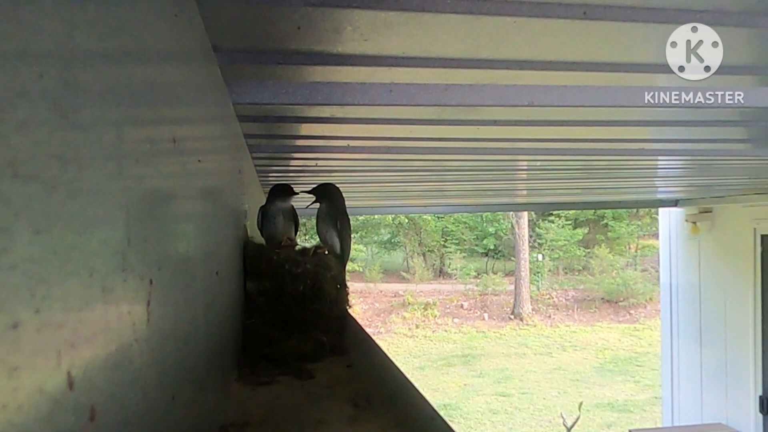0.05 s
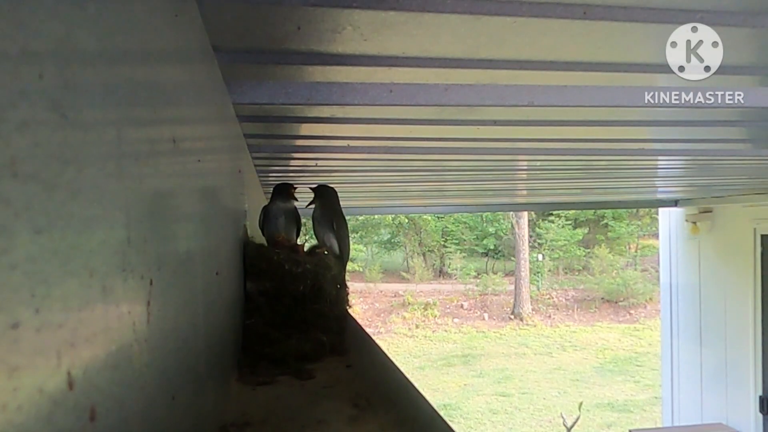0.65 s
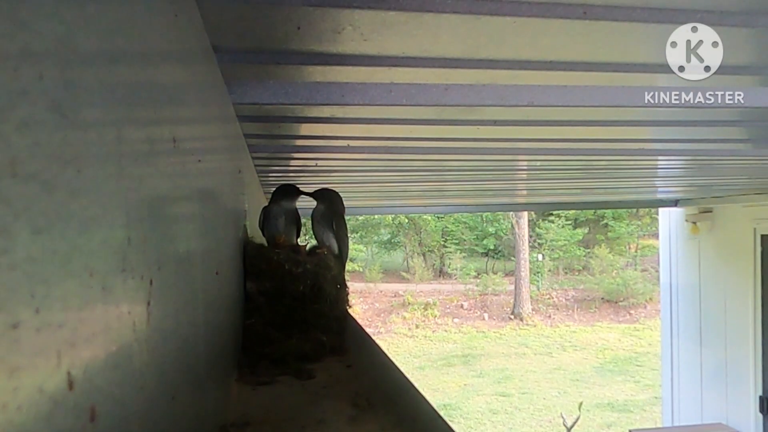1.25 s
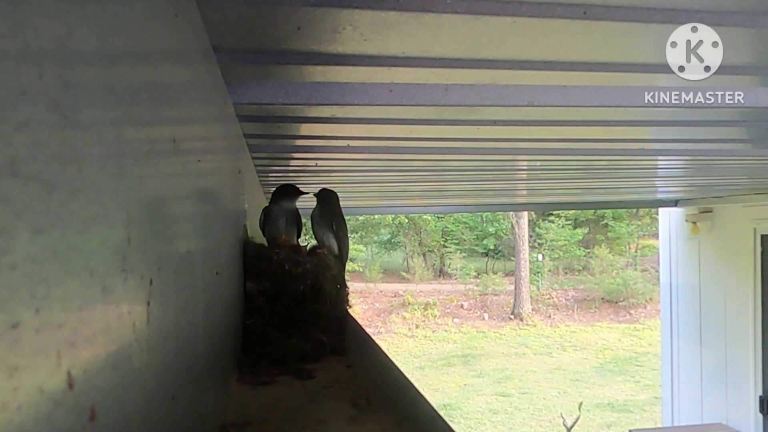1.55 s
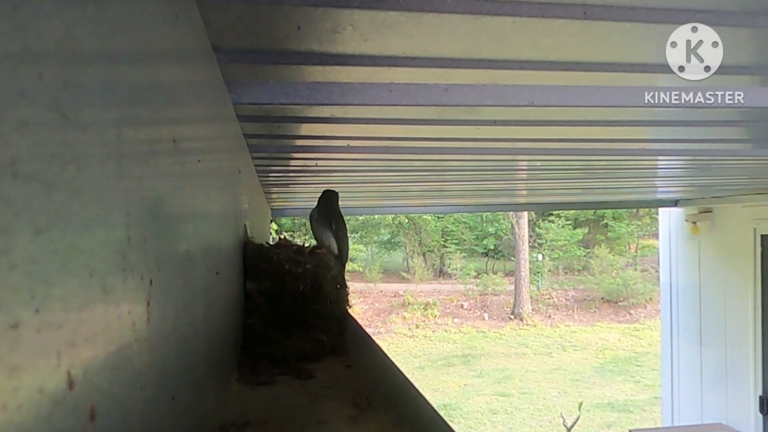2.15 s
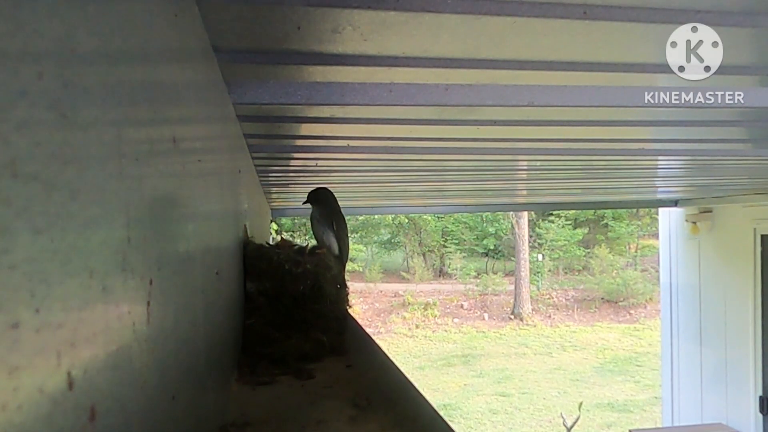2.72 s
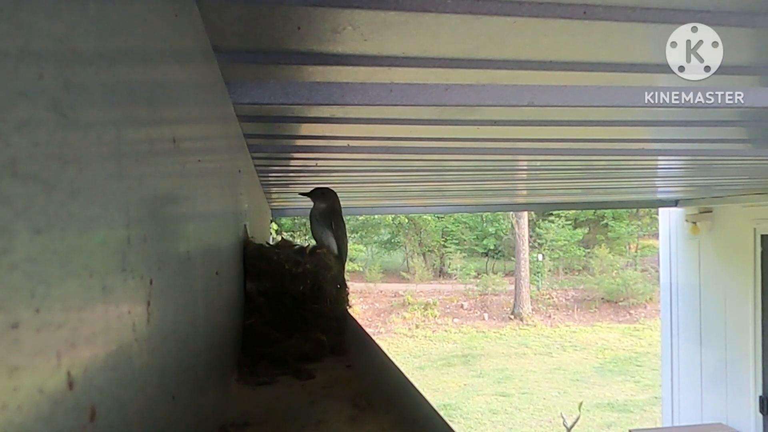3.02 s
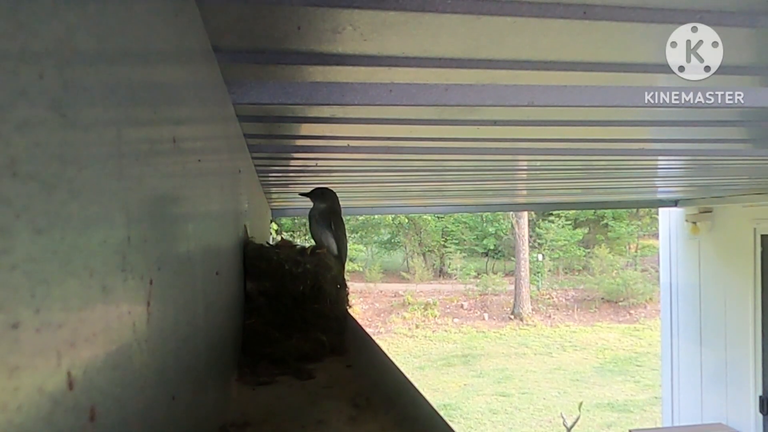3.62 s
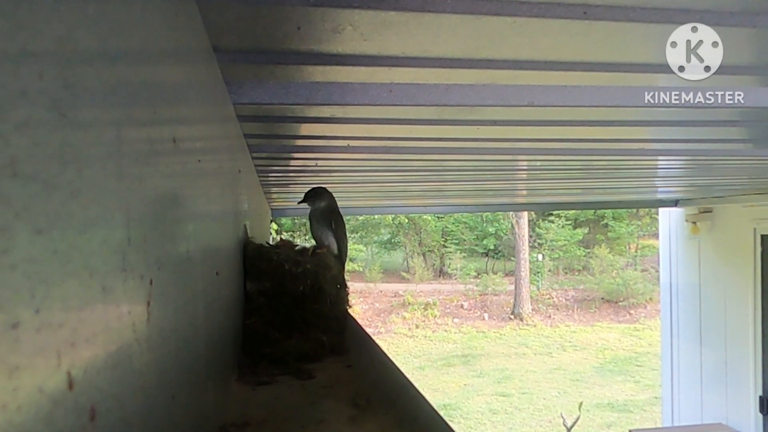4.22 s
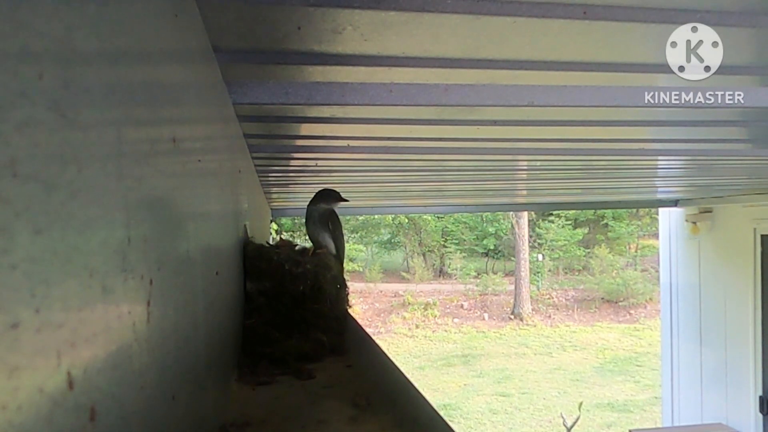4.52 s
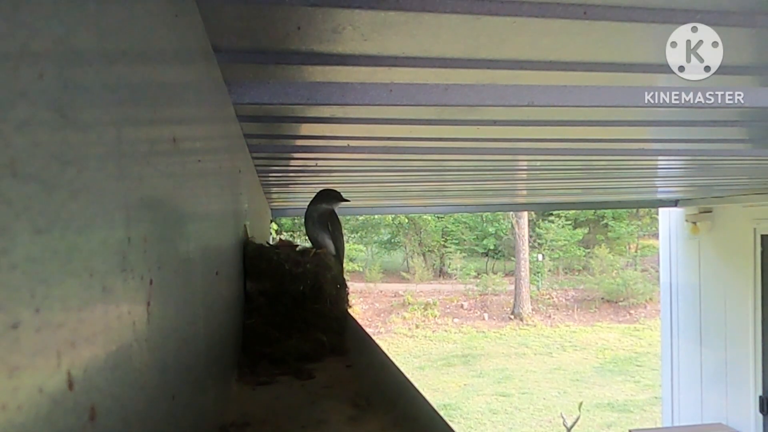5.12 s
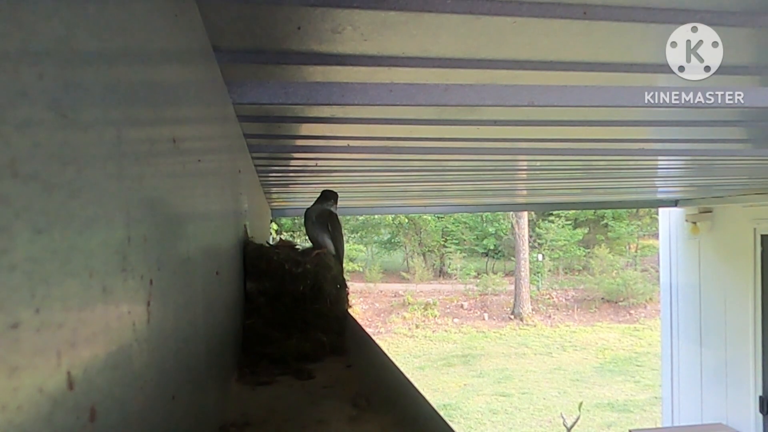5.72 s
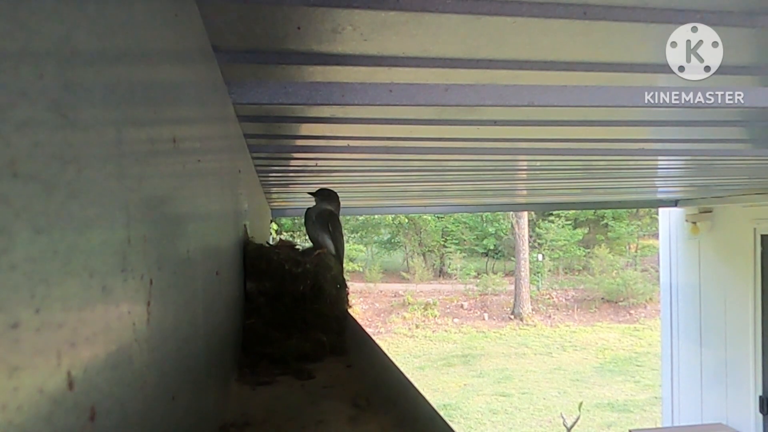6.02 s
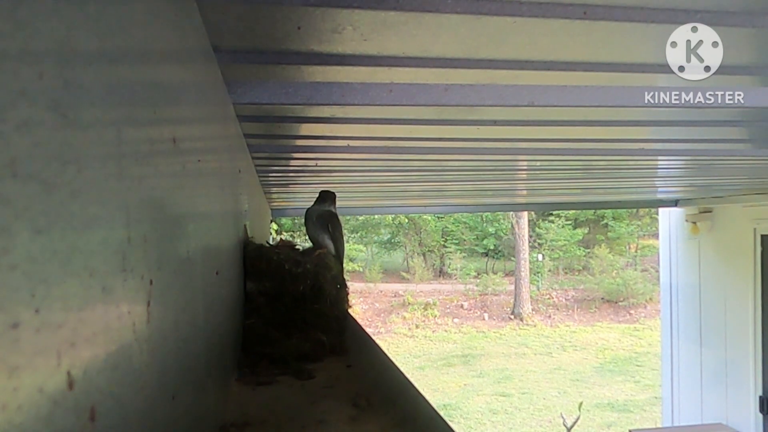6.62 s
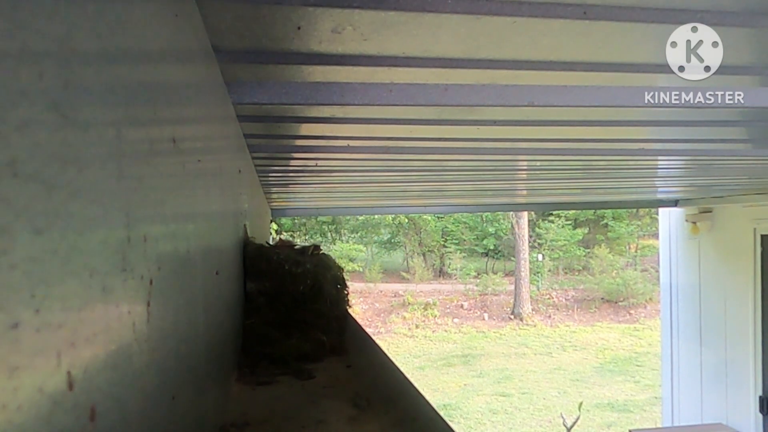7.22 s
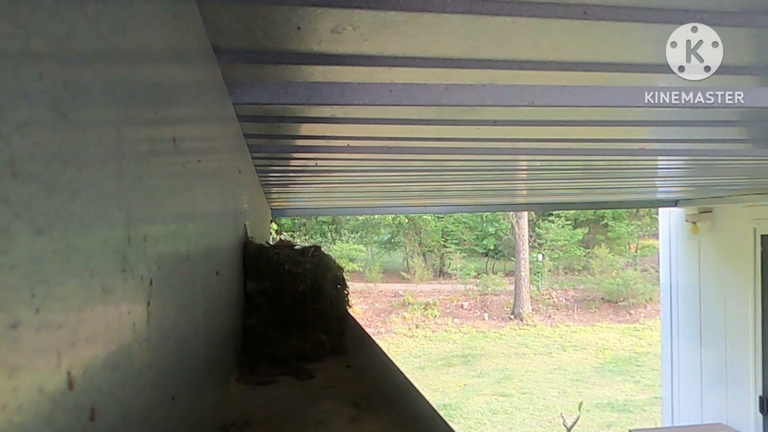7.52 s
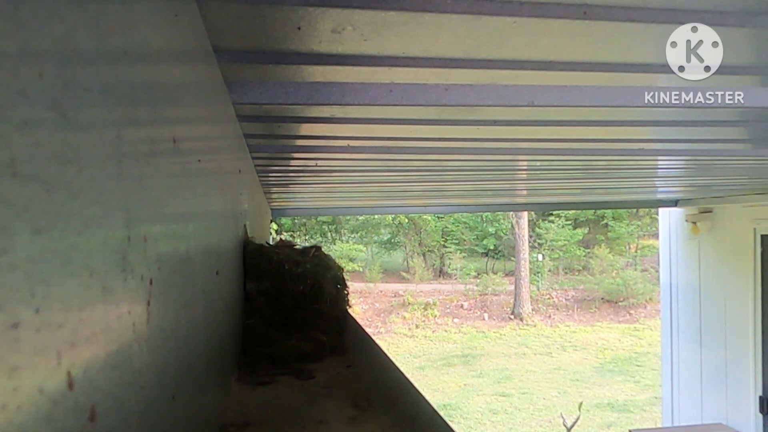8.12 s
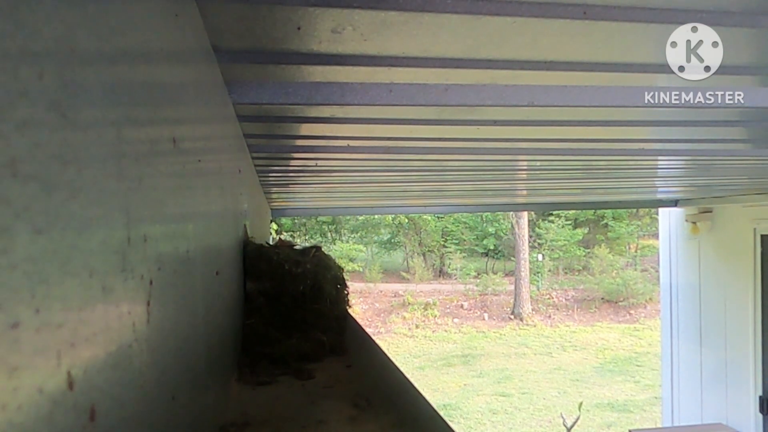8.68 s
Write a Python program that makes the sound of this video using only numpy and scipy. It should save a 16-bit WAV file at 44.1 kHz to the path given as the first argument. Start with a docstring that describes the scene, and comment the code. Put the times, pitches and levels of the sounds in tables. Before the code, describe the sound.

Pulsing frog trills and a few bird chirps outdoors, followed by a loud, close flurry of thumping wingbeats and swishing feathers.

```python
"""A distant road and a far frog chorus murmur beyond a porch roof. A bird at its nest gives one buzzy
chirp from its syrinx, then thin peeps and dry ticks of bill and claw. Tree frogs trill in the garden,
each note a pulse coloured by the vocal sac, while other birds call and hoarse squeaks fade in the trees.
Then the bird takes off and hovers beside the microphone, each wingbeat a thump of air with a swish
of feathers."""
import sys
import numpy as np
from scipy import signal
from scipy.fft import rfft, irfft, next_fast_len
from scipy.io import wavfile

SR = 44100
rng = np.random.default_rng(int(sys.argv[2]) if len(sys.argv) > 2 else 0)


def wav_record(signal):
    """Record a signal, one row per channel, as 16-bit PCM in the file named by sys.argv[1]."""
    frames = np.transpose(np.atleast_2d(signal))
    bounded = np.clip(frames, -1, 1)
    # unit amplitude maps onto the largest positive 16-bit level
    quanta = np.round(bounded * 32767).astype(np.int16)
    wavfile.write(sys.argv[1], SR, quanta)


N = 385875
TIME = np.arange(N) / SR


def from_db(db):
    """Decibels to gain."""
    return 10 ** (np.asarray(db) / 20)


def rms_one(x):
    """Scale to unit rms."""
    return x / np.sqrt(np.mean(x ** 2) + 1e-20)


def fader(points):
    """Gain riding along a curve of (seconds, dB) points."""
    return from_db(np.interp(TIME, *np.transpose(points)))


def drift(rate_hz):
    """Smooth random wander of spread 1."""
    hop, warm_up = 40, 2000
    pole = np.exp(-2 * np.pi * hop * rate_hz / SR)
    white = rng.standard_normal(N // hop + warm_up + 2)
    slow = signal.lfilter([1], [1, -2 * pole, pole * pole], white)[warm_up:]
    return np.interp(np.arange(N) / hop, np.arange(len(slow)), rms_one(slow))


def band(x, low_hz, high_hz, order=2):
    """Band-pass; a higher order gives steeper edges."""
    return signal.sosfilt(signal.butter(order, [low_hz, high_hz], "band", fs=SR, output="sos"), x + 1e-18)


def stereo(mid, side, side_db):
    """Left and right from a shared and an opposed part."""
    return mid + from_db(side_db) * side * np.array([[1], [-1]])


def noise(colour, side_db):
    """Stereo noise of rms 1, shaped by (Hz, dB) points and falling 40 dB an octave beyond them."""
    size = next_fast_len(N)
    hz, db = np.transpose(colour)
    bins = np.maximum(np.arange(size // 2 + 1) * SR / size, 1)
    octaves_beyond = np.abs(np.log2(bins / np.clip(bins, hz[0], hz[-1])))
    gain = from_db(np.interp(np.log(bins), np.log(hz), db) - 40 * octaves_beyond)
    mid, side = irfft(rfft(rng.standard_normal((2, size))) * gain, size)[:, :N]
    return rms_one(stereo(mid, side, side_db))


def echoes(x, t60, delay_s, side_db):
    """Diffuse reflections that arrive after a delay and die away; the tail has unit energy."""
    t = np.arange(SR) / SR
    tail = rng.standard_normal((2, SR)) * from_db(-60 * t / t60) * (t > delay_s)
    tail = stereo(tail[0], tail[1], side_db)
    return signal.fftconvolve(x[None], tail / np.sqrt(np.sum(tail ** 2) / 2), axes=1)[:, :N]


def add(out, start_s, sound):
    """Mix a short sound in at a time."""
    i = max(int(start_s * SR), 0)
    out[i:i + len(sound)] += sound[:max(N - i, 0)]


def bell(t, width_s):
    """Gaussian bump of height 1."""
    return np.exp(-.5 * (t / width_s) ** 2)


def beats(first_s, last_s, count, slowing_per_s):
    """Times of a run of beats whose spacing lengthens steadily."""
    progress, length = np.linspace(0, 1, count), last_s - first_s
    return first_s + length * progress * (1 + slowing_per_s * length * (progress - 1))


def garden(rumble_db=-54, hiss_db=-76, settle_db=-11, settle_s=1):
    """The bed: distant road, throbbing far chorus, insects, deep rumble, faint hiss and an appliance hum."""
    # Fader moves of road, frog chorus and insects. Each row: time in seconds, level in dB.
    road_levels = [(0.3, -56), (0.35, -55.5), (0.71, -51.5), (2.07, -48.5), (6.05, -47), (6.46, -43),
                   (7.0, -46.5)]
    chorus_levels = [(0.25, -75.5), (1.29, -64.5), (3.75, -65.5), (3.96, -60), (4.45, -71.5), (4.53, -62),
                     (4.72, -61.5), (4.9, -64), (4.98, -58), (5.29, -58), (5.42, -63), (6.92, -59),
                     (7.05, -66), (8.3, -64)]
    insect_levels = [(2.1, -84), (2.15, -81), (4.04, -81), (4.27, -86), (6.11, -79), (6.9, -84)]
    # Tone colours of the noise layers. Each row: frequency in Hz, relative level in dB.
    road_colour = [(60, -7.5), (110, -7), (156, 0), (210, -3), (270, -5.5), (340, -8.5), (390, -14),
                   (440, -11), (540, -26.5), (640, -28.5), (800, -40), (1000, -40)]
    rumble_colour = [(20, -1.5), (40, -4.5), (70, -2.5), (100, -16.5), (140, -24.5)]
    chorus_colour = [(800, -36.5), (1000, -19), (1200, -1), (1330, 1), (1410, 5.5), (1460, -2.5),
                     (1530, -9.5), (1750, -11), (2000, -8.5), (2400, -32.5), (2800, -25), (3200, -43.5)]
    insect_colour = [(3800, -11), (4200, -6), (4430, -3), (4650, -14.5), (4950, -24.5)]
    hiss_colour = [(500, -2), (1000, -5.5), (3000, -2.5), (5000, -12), (7500, -11), (10000, -24),
                   (14000, -39.5)]
    # Partials of a house appliance. Each row: frequency in Hz, settled rms level in dB.
    hum_partials = [(120, -56.5), (269, -58), (435, -69.5), (600, -76)]
    road = fader(road_levels) * noise(road_colour, side_db=-27)
    rumble = from_db(rumble_db) * noise(rumble_colour, side_db=-24)
    chorus = fader(chorus_levels) * from_db(1.6 * drift(23)) * noise(chorus_colour, side_db=-6.5)
    insects = fader(insect_levels) * from_db(1.2 * drift(25)) * noise(insect_colour, side_db=-4.5)
    hiss = from_db(hiss_db) * noise(hiss_colour, side_db=0)
    hum = sum(np.sqrt(2) * from_db(db + 1.6 * drift(5.2)) * np.sin(2 * np.pi * hz * TIME + .5 * drift(2))
              for hz, db in hum_partials)
    settle = from_db(settle_db * np.exp(-TIME / settle_s))  # starts low and eases up to full level
    return road + chorus + settle * (insects + rumble + hiss + hum)


def syrinx(syllables, buzz_hz, regular=1, ragged=.12):
    """Near-sine glides; a fast flutter of the syrinx makes them buzz, and the tone weakens on upswings."""
    out = np.zeros(N)
    flutter_phase = 2 * np.pi * np.cumsum(buzz_hz * (1 + .3 * drift(120))) / SR
    flutter = regular * np.sin(flutter_phase) + ragged * drift(200)
    for start, length, start_hz, middle_hz, end_hz, db, depth_hz, overtone_db in syllables:
        progress = np.linspace(0, 1, int(length * SR))
        hz = np.polyval(np.polyfit([0, .5, 1], [start_hz, middle_hz, end_hz], 2), progress)
        swing_hz = depth_hz * flutter.take(int(start * SR) + np.arange(len(progress)), mode="wrap")
        phase = 2 * np.pi * np.cumsum(hz + swing_hz) / SR
        arch = np.sin(np.pi * progress)
        envelope = np.abs(arch) ** 0.9 * np.tanh(2 * arch) * (1 - swing_hz / hz)
        overtones = np.sin(2 * phase) + 0.37 * np.sin(3 * phase) + .1 * np.sin(4 * phase)
        add(out, start, from_db(db) * envelope * (np.sin(phase) + from_db(overtone_db) * overtones))
    return out


def birds(hollows_hz=(4380, 5250, 5550), peep_depth_hz=45, peep_overtone_db=-38, tree_overtone_db=-45.5,
          beam_delay_s=0.021):
    """Nest calls bounce off a beam and ring briefly under the roof; birds in the trees are mostly echo."""
    # Syllables of the buzzy chirp. Each row: start and length in seconds, start, middle and end pitch
    # in Hz, level in dB, buzz depth in Hz, overtones in dB against the tone.
    chirp_syllables = [(.3765, .014, 2930, 2980, 2950, -37.5, 0, -40),
                       (.396, .011, 3050, 3250, 3150, -47, 150, -25),
                       (.408, .009, 3000, 3100, 3400, -36, 150, -30),
                       (.415, .005, 3600, 3800, 3700, -38, 250, -28),
                       (.421, .011, 3550, 3750, 3850, -41, 550, -30),
                       (.429, .011, 3600, 3900, 3650, -30, 820, -33),
                       (.443, .013, 3780, 4020, 3720, -29, 850, -33),
                       (.456, .013, 3500, 3330, 3180, -40, 200, -22),
                       (.466, .014, 3250, 3000, 2820, -30.5, 20, -30),
                       (.528, .007, 3300, 3550, 3750, -33.5, 120, -31),
                       (.533, .007, 3850, 4000, 4050, -35.5, 120, -21)]
    # Thin peeps at the nest. Each row: start and length in seconds, start, middle and end pitch in Hz,
    # level in dB.
    nest_peeps = [(0.515, 0.016, 6700, 6500, 6500, -64), (0.536, 0.068, 6600, 6630, 7040, -64),
                  (0.786, 0.039, 6400, 5940, 5170, -74.5), (0.942, 0.065, 5860, 6500, 5850, -64.5),
                  (1.444, 0.058, 6400, 7070, 7100, -59.5), (2.315, 0.052, 6840, 6600, 6200, -70),
                  (2.421, 0.018, 7400, 7230, 7000, -59), (3.371, 0.036, 6030, 6500, 6300, -63.5),
                  (4.631, 0.024, 6230, 6370, 6070, -64), (7.14, 0.06, 6320, 6740, 6900, -60),
                  (7.313, 0.022, 7120, 7030, 7060, -55.5), (8.308, 0.053, 6000, 7080, 6050, -54)]
    # Straight glides from the trees. Each row: start and length in seconds, start and end pitch in Hz,
    # relative level in dB, nominal buzz depth in Hz.
    tree_calls = [(0.866, 0.33, 2990, 3290, -63, 454), (3.268, 0.15, 7040, 6630, -69, 197),
                  (3.956, 0.13, 3205, 3020, -56.5, 306), (4.093, 0.121, 3250, 3040, -49.5, 523),
                  (4.195, 0.043, 8230, 7300, -59.5, 195), (5.125, 0.08, 7100, 5900, -68, 400),
                  (5.167, 0.13, 5600, 5100, -60.5, 350), (5.412, 0.11, 3180, 2790, -53, 180),
                  (5.613, 0.07, 3230, 2764, -52, 220), (6.414, 0.21, 3190, 3140, -62.5, 400),
                  (7.197, 0.11, 4310, 3610, -47.5, 610), (8.277, 0.12, 3230, 2936, -54.5, 400),
                  (8.483, 0.11, 2930, 3020, -48, 424), (8.63, 0.12, 2990, 2850, -52, 500)]
    chirp = syrinx(chirp_syllables, buzz_hz=390)
    for hz in hollows_hz:  # notches hollow out the chirp above its tone
        chirp = signal.lfilter(*signal.iirnotch(hz, Q=16, fs=SR), chirp)
    chirp = signal.sosfilt(signal.ellip(7, .5, 55, 2780, "high", fs=SR, output="sos"), chirp + 1e-18)
    peeps = syrinx([(*peep, peep_depth_hz, peep_overtone_db) for peep in nest_peeps], buzz_hz=306)
    nest = chirp + peeps
    glides = [(start, length, start_hz, (start_hz + end_hz) / 2, end_hz, db, depth, tree_overtone_db)
              for start, length, start_hz, end_hz, db, depth in tree_calls]
    trees = syrinx(glides, buzz_hz=108.8, regular=0.66, ragged=0.501)
    porch = from_db(-8.5) * echoes(nest, t60=.19, delay_s=.004, side_db=-2.5)
    beam = from_db(-17) * np.interp(TIME - beam_delay_s, TIME, nest)
    tree_echo = from_db(-6.5) * echoes(trees, t60=0.72, delay_s=0.0027, side_db=-6)
    return nest + beam + porch + from_db(-12.5) * trees + tree_echo


def frog_notes(slack_lower_db=-4.5, slack_upper_db=-25, slack_sharp=.07,
               scatter_db=1.3, pitch_scatter=0.0095):
    """A trill starts slack: quieter, duller and a little sharp until the frog works up to full effort."""
    # Trills of the near frogs. Each row: first and last note in seconds, note count, slowing per second,
    # pitch in Hz, lower and upper partial in dB, swell time in seconds, growth in dB per second,
    # relative pitch rise of the lower partial per second, echo send in dB.
    trills = [(0.665, 1.683, 24, 0.08, 1084, -59.5, -58, 0.17, 1, 17.6, 4.5),
              (1.752, 2.241, 10, 0.17, 1307, -55.5, -67, 0.062, -29, 24, -7),
              (2.372, 3.302, 21, 0.033, 972, -55, -53, 0.44, 2.5, 17, 2),
              (3.691, 3.948, 7, 0.2, 1353, -55.5, -72, 0.13, 15, 29.3, -4.5),
              (4.598, 5.287, 17, .1, 1074, -52.5, -49.7, 0.18, -1.5, 15.05, 3.5),
              (6.175, 6.56, 10, 0.097, 1032, -54, -60, 0.18, 17, 25.7, -7),
              (8.449, 8.749, 8, 0.047, 1023, -50.5, -54, 0.16, 2, 20, -2.5)]
    notes = []
    for first, last, count, slowing, hz, lower_db, upper_db, swell_s, growth, rise, echo_db in trills:
        for onset in beats(first, last, count, slowing):
            slack = np.clip(1 - (onset - first) / swell_s, 0, 1) ** 2
            chance, grown_db = rng.standard_normal(3), growth * (onset - first)
            note_hz = hz * (1 + slack_sharp * slack + pitch_scatter * chance[0])
            note_lower_db = lower_db + grown_db + slack_lower_db * slack + scatter_db * chance[1]
            note_upper_db = upper_db + grown_db + slack_upper_db * slack + scatter_db * chance[2]
            notes.append((onset, note_hz, note_lower_db, note_upper_db, rise, echo_db))
    return notes


def near_frogs(sac_hz=1150, pitch_follow=0.29, upper_lead_s=.002, after_s=0.015, sweep_s=0.00889,
               upper_rise_per_s=10, sweep_scatter=0.21, grit_db=-15):
    """Each note is a rising pulse and an after-pulse; the vocal sac pulls the lower partial to its pitch."""
    direct, echo_send = np.zeros((2, N))
    t = np.arange(-SR // 40, SR // 40) / SR
    bend = sweep_s * np.tanh(t / sweep_s)
    for onset, hz, lower_db, upper_db, rise, echo_db in frog_notes():
        start_phase = rng.uniform(0, 2 * np.pi, 2)
        sweep = 1 + sweep_scatter * rng.standard_normal()
        lower_hz = sac_hz * (hz / sac_hz) ** pitch_follow * (1 + rise * bend)
        upper_hz = 2 * hz * (1 + upper_rise_per_s * sweep * (bend + upper_lead_s))
        lower = np.sin(2 * np.pi * np.cumsum(lower_hz) / SR + start_phase[0])
        upper = np.sin(2 * np.pi * np.cumsum(upper_hz) / SR + start_phase[1])
        lower *= from_db(lower_db) * bell(t, width_s=0.0037)
        upper *= from_db(upper_db) * bell(t + upper_lead_s, width_s=0.0046)
        add(direct, onset + t[0], lower + upper)
        add(direct, onset + t[0] + after_s, from_db(echo_db / 2) * (0.7 * lower + .3 * upper))
        add(echo_send, onset + t[0], from_db(echo_db) * (lower + from_db(-1.5) * upper))
    throat = band(rng.standard_normal(N), 1680, 2520, order=6)
    throat += .4 * band(rng.standard_normal(N), 920, 1400, order=6)
    grit = from_db(grit_db) * np.abs(signal.hilbert(direct)) * rms_one(throat)
    # The porch answers at once, the trees much later; both give back more of the lower partial.
    porch = echoes(from_db(-7) * echo_send, t60=0.1, delay_s=0.006, side_db=-20)
    trees = echoes(from_db(-4.5) * echo_send, t60=.7, delay_s=.04, side_db=-8)
    return band(direct + grit + porch + trees, 890, 2750, order=6)


def ticks(decay_s=0.0018, top_hz=8600):
    """Tiny dry snaps of bill and claws; the fuller ones reach lower."""
    # Each row: start in seconds, level before filtering in dB, low edge in Hz.
    snaps = [(0.7672, -62, 4500), (1.568, -60, 5600), (2.837, -59, 5600), (3.362, -49, 5600),
             (4.1924, -59, 5600), (4.878, -55, 3200), (5.1128, -57, 5600), (5.2044, -59, 5600),
             (6.0735, -58.5, 5600), (6.104, -59, 5600), (6.32, -59, 5600)]
    out, t = np.zeros(N), np.arange(SR // 50) / SR
    for start, db, low_hz in snaps:
        snap = from_db(db) * rng.standard_normal(len(t)) * np.exp(-t / decay_s)
        add(out, start, band(band(snap, low_hz, top_hz), 0.77 * low_hz, 9800))
    return out + from_db(-6) * echoes(out, t60=.15, delay_s=.006, side_db=1)


def far_frogs(notes_per_s=20, throb=0.12, half_width_hz=160, attack_s=0.16, release_s=0.18):
    """Distance smears these trills into throbbing bands of noise."""
    # Each row: start and start of the release in seconds, centre in Hz, level in dB.
    far_trills = [(0.773, 1.893, 2380, -68.5), (1.3, 2.3, 2636, -73), (2.287, 3.37, 2583, -74),
                  (2.55, 3.3, 2260, -70), (2.75, 3.25, 2720, -76.5), (3.658, 4.107, 2160, -74.5),
                  (3.703, 4.01, 2540, -71.5), (4.886, 5.4, 2400, -65.5), (5.05, 5.33, 2510, -75),
                  (5.2, 5.977, 2220, -73.5), (5.295, 8.75, 1870, -72), (6.145, 6.743, 1960, -66),
                  (6.233, 6.66, 2465, -68), (8.347, 8.75, 1963, -63)]
    out = 0
    for start, end, hz, db in far_trills:
        beat = np.sin(2 * np.pi * np.cumsum(notes_per_s * (1 + 0.072 * drift(3.2))) / SR)
        envelope = np.clip((TIME - start) / attack_s, 0, 1) * np.clip((end - TIME) / release_s + 1, 0, 1)
        white = stereo(*rng.standard_normal((2, N)), side_db=-4.5)
        voice = band(white, hz - half_width_hz, hz + half_width_hz, order=6)
        out = out + from_db(db) * envelope * (1 + throb * beat) * rms_one(voice)
    return out


def squeaks(attack_s=0.048, pitch_hz=990, sag_per_s=.55, hoarseness=.012):
    """High overtones of a sagging, unsteady voice, mixed with hiss, die away among the trees."""
    # Hoarse calls. Each row: start in seconds, decay in seconds, relative level in dB.
    calls = [(1.228, .17, -75), (1.575, 0.064, -69.5), (1.835, 0.073, -71)]
    # Colour of their hiss. Each row: frequency in Hz, relative level in dB.
    hiss_colour = [(4400, -4), (5100, -7), (6000, -2), (7000, -4), (7700, -5.5), (8300, -22),
                   (10000, -27.5)]
    out, waver = 0, 1 + hoarseness * drift(150)
    hiss = from_db(-1.5 + 1.5 * drift(60)) * noise(hiss_colour, side_db=-8)
    for start, decay, db in calls:
        age = np.clip(TIME - start, 0, None)
        hz = pitch_hz * waver * np.exp(-sag_per_s * np.minimum(age, .3))
        phase = 2 * np.pi * np.cumsum(hz) / SR
        voice = sum(gain * np.sin(k * phase) for k, gain in [(5, .5), (6, .8), (7, 1), (8, .8)])
        tone = from_db(1) * np.exp(-age / decay) * rms_one(voice)
        envelope = np.minimum(age / attack_s, 1) * np.exp(-np.maximum(age - attack_s, 0) / decay)
        out = out + from_db(db) * envelope * (hiss + tone)
    return from_db(-2.5) * out + from_db(-4) * echoes(out.mean(axis=0), t60=.7, delay_s=0.012, side_db=-7)


def rumble_swells():
    """Narrow bands of the low rumble rise and sink again."""
    # Each row: crest time and width in seconds, frequency in Hz, level at the crest in dB.
    swells = [(1.658, 0.036, 281, -47), (2.366, 0.084, 162.7, -40.5), (2.31, 0.064, 245, -48),
              (3.4, 0.058, 118, -50.5), (3.9, 0.023, 293, -42.5), (3.8, 0.073, 158, -45.5),
              (6.44, 0.42, 288, -50), (3, 0.3, 64, -52)]
    out = 0
    for crest, width, hz, db in swells:
        rumble = rms_one(band(rng.standard_normal(N), hz * 0.872, hz * 1.057))
        out = out + from_db(db) * bell(TIME - crest, width) * rumble
    return out


def stirred_air(first_s, last_s, lead_s=0.0073, attack_s=0.021, release_s=0.029):
    """Attack, hold and release of the air that a burst of flapping sets moving."""
    early, late = np.maximum(first_s - lead_s - TIME, 0), np.maximum(TIME - last_s, 0)
    return np.exp(-np.minimum(early / attack_s + late / release_s, 20))


def flicker(x, depth_db, rate_hz, bands=10):
    """Each stretch of the spectrum flickers on its own."""
    size = next_fast_len(N)
    spectrum = rfft(x, size)
    log_hz = np.log(np.maximum(np.arange(size // 2 + 1) * SR / size, 1))
    centres = np.log(np.geomspace(1200, 11000, bands))
    parts = (irfft(spectrum * np.interp(log_hz, centres, share), size)[:, :N] for share in np.eye(bands))
    return sum(part * from_db(depth_db * drift(rate_hz)) for part in parts)


def wings(force_scatter_db=1.3, snap_scatter_db=3.5):
    """Each wingbeat is a thump of air; feathers swish on both strokes, over eddies and a whoosh."""
    # Bursts of flapping. Each row: first and last beat in seconds, beat count, pressure in dB, growth
    # in dB per second, suction from 0 to 1, relative levels of feathers, eddies and whoosh in dB.
    bursts = [(7.184, 7.419, 6, -20.5, -14, 0.23, -57.5, -37.5, -54.5),
              (7.549, 7.646, 3, -19.5, -55, 0.4, -59, -36, -70),
              (7.724, 7.837, 3, -21.5, -50, 0.68, -63, -44, -67),
              (7.897, 8.367, 9, -23.5, 4, 0.87, -65.5, -45.5, -69.5),
              (8.417, 8.417, 1, -27, 0, 0.7, -65, -46, -69), (8.519, 8.573, 2, -17, 5, 0.53, -61, -49, -64),
              (8.677, 8.732, 2, -13, 20, 0.54, -62, -42, -63.5)]
    # Feathers rustle as the bird shifts or takes off. Each row: time and width in seconds, level in dB.
    rustles = [(1.86, 0.024, -64), (2.03, 0.011, -72), (2.15, 0.054, -77), (2.26, 0.13, -76.5),
               (6.986, 0.042, -66), (7.118, 0.017, -69)]
    # Colours of the feathers and the moving air. Each row: frequency in Hz, relative level in dB.
    feather_colour = [(400, 6), (800, -11), (1150, 11.5), (1400, 18.5), (1560, 10), (1900, 17.5),
                      (2300, 8.5), (2570, 5.5), (2800, 7), (4000, 3.5), (4700, 2.5), (5200, 3), (6500, 6),
                      (8000, 2.5), (10000, -3.5), (11500, -18), (14000, -16.5)]
    eddy_colour = [(20, 11), (60, -13), (120, 5), (200, -4.5), (350, -12), (550, -19.5), (900, -44)]
    whoosh_colour = [(150, -16), (300, -2), (500, -1), (800, -7), (1100, -14.5)]
    pressure, strokes, feather_gain, eddy_gain, whoosh_gain = np.zeros((5, N))
    t = np.arange(-SR // 12, SR // 12) / SR
    # The upstroke draws air away; the downstroke gathers air, pushes it and ends in a sharp suction.
    upstroke = 0.6 * bell(t + 0.0243, width_s=0.003)
    gather = bell(t + 0.00986, width_s=0.0025)
    push = bell(t, width_s=.0045)
    snap = bell(t - 0.0097, width_s=0.002)
    wake = 0.27 * bell(t - .022, width_s=0.0066)
    for first, last, count, db, growth, suction, feather_db, eddy_db, whoosh_db in bursts:
        for onset in beats(first, last, count, slowing_per_s=0.062):
            chance = rng.standard_normal(2)
            force = from_db(db + growth * (onset - first) + force_scatter_db * chance[0])
            pull = upstroke + suction * (gather + from_db(snap_scatter_db * chance[1]) * snap) + wake
            add(pressure, onset + t[0], force * (push - pull))
            add(strokes, onset + t[0], 0.5 * bell(t + 0.025, width_s=0.0061) + 0.19 * push)
        effort = stirred_air(first, last) * from_db(growth * (np.clip(TIME, first, last) - first))
        feather_gain += from_db(feather_db) * effort
        eddy_gain += from_db(eddy_db) * effort
        whoosh_gain += from_db(whoosh_db) * effort
    rustle = sum(from_db(db) * bell(TIME - crest, width) for crest, width, db in rustles)
    swish = feather_gain * (1.14 + 1.5 * strokes) + rustle
    vanes = rms_one(flicker(noise(feather_colour, side_db=-5.5), depth_db=2.7, rate_hz=60))
    feathers = swish * from_db(1.55 * drift(80)) * vanes
    eddies = eddy_gain * (0.8 + 0.45 * strokes) * from_db(3.8 * drift(52))
    eddies = eddies * noise(eddy_colour, side_db=-41)
    whoosh = whoosh_gain * from_db(3.8 * drift(40)) * noise(whoosh_colour, side_db=-27)
    lean_left = from_db([[.2], [-.2]])
    return (pressure + eddies) * lean_left + feathers + whoosh


def feather_flicks():
    """Flight feathers slide over each other in short, bright, grainy strokes."""
    # Each row: time and width in seconds, level at the crest in dB.
    flicks = [(7.096, 0.011, -63), (7.159, 0.0057, -58.5), (7.208, 0.0033, -54), (7.254, 0.0052, -61),
              (7.353, 0.0039, -57), (7.395, 0.0055, -56), (7.529, 0.0037, -61), (7.571, 0.004, -68),
              (7.607, 0.0026, -68), (7.726, .004, -71), (8.041, 0.0049, -60.5), (8.218, 0.0033, -69),
              (8.522, 0.0026, -57), (8.549, 0.0027, -58.5), (8.676, 0.0036, -63)]
    # Colour of a flick. Each row: frequency in Hz, relative level in dB.
    flick_colour = [(1500, 11), (3500, -3.5), (5000, -1), (6500, 4), (8000, 5), (10000, -4), (12000, -17),
                    (14000, -19)]
    envelope = sum(from_db(db) * bell(TIME - crest, width) for crest, width, db in flicks)
    return envelope * from_db(.8 * drift(330)) * noise(flick_colour, side_db=-5)


def air_slaps(cutoff_hz=520):
    """A wing tip sweeps close to the microphone: a sudden suction, after which the air wobbles briefly."""
    # Each row: start in seconds, wobble in Hz, decay in seconds, level before filtering in dB.
    slaps = [(7.187, 220, 0.012, -33.5), (7.235, 161, 0.0039, -22.5), (7.243, 270, 0.0049, -23.5),
             (7.292, 370, 0.012, -33.5), (7.335, 326, 0.0076, -32), (7.379, 150.4, 0.015, -24.5),
             (7.391, 345, 0.0071, -32.5), (7.556, 195, 0.0048, -18), (7.601, 182, 0.0084, -23.5),
             (7.731, 166, 0.0046, -22.5), (8.315, 197, 0.0042, -26.5), (8.376, 172, 0.0056, -31),
             (8.525, 196, 0.0047, -28.5), (8.684, 200, 0.0017, -16.5)]
    out, t = np.zeros(N), np.arange(SR // 10) / SR
    for start, hz, decay, db in slaps:
        add(out, start, -from_db(db) * np.sin(2 * np.pi * hz * t) * np.exp(-t / decay))
    return signal.sosfilt(signal.butter(4, cutoff_hz, fs=SR, output="sos"), out + 1e-18)


def scene():
    """Everything heard from under the porch roof."""
    bed = garden() + rumble_swells()
    voices = near_frogs() + far_frogs() + birds() + squeaks()
    movement = ticks() + wings() + air_slaps() + feather_flicks()
    return bed + voices + movement


def record(dry, open_at_s=0.165, fade_s=0.0046, stopband_hz=15300):
    """The microphone lets steady pressure leak away; the sound fades in fast and the top is cut."""
    dry = signal.sosfilt(signal.butter(1, 3, "high", fs=SR, output="sos"), dry)
    fade_in = np.clip((TIME - open_at_s) / fade_s, from_db(-51), 1)
    return signal.sosfilt(signal.cheby2(12, 70, stopband_hz, fs=SR, output="sos"), dry * fade_in)


dry = scene()
out = record(dry)
wav_record(out)
```